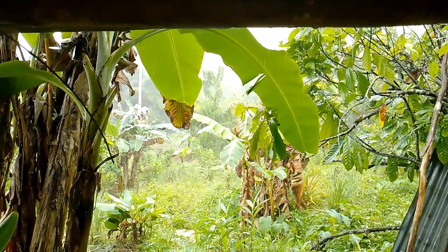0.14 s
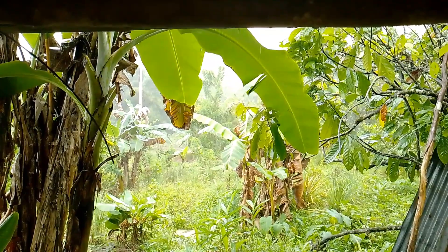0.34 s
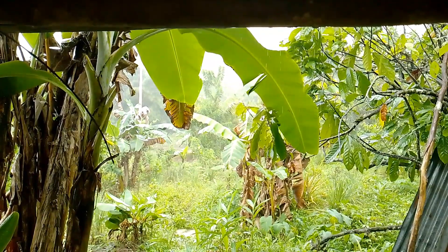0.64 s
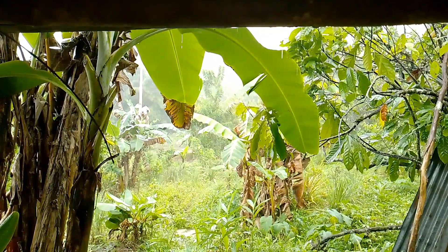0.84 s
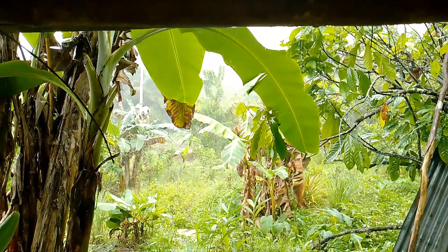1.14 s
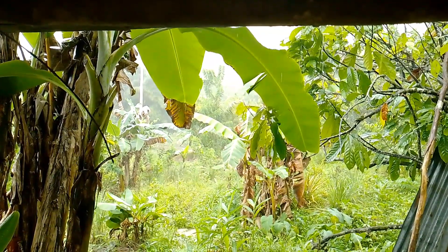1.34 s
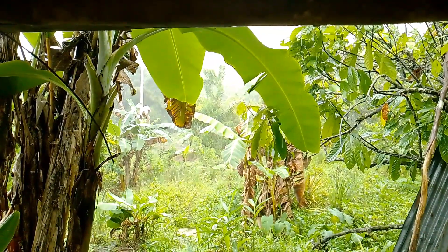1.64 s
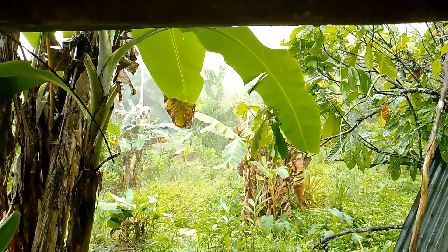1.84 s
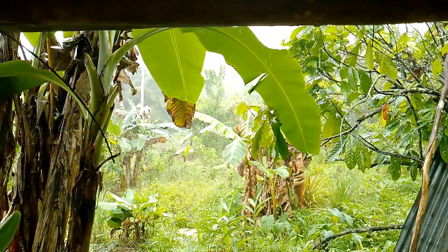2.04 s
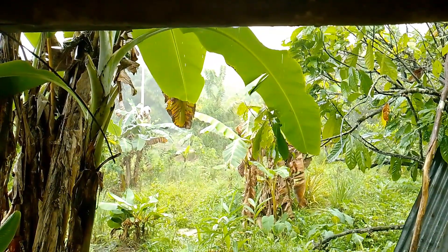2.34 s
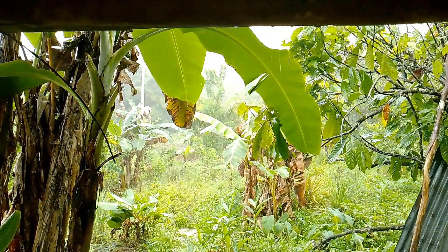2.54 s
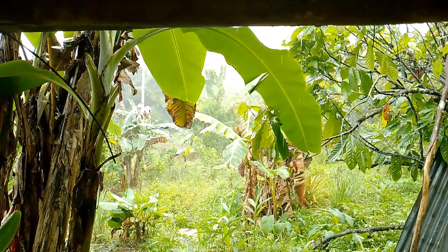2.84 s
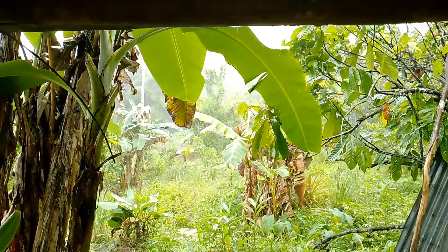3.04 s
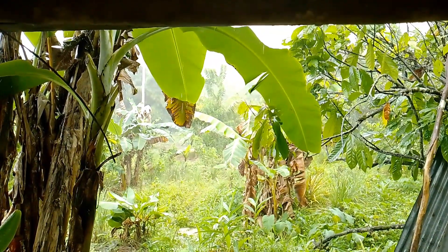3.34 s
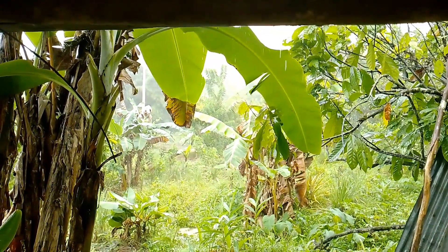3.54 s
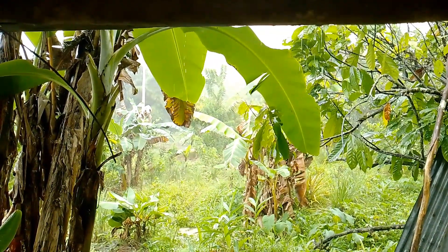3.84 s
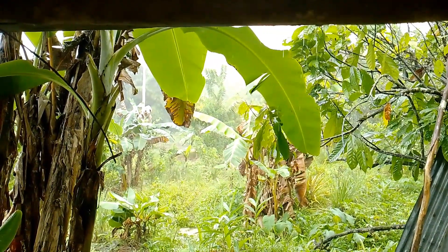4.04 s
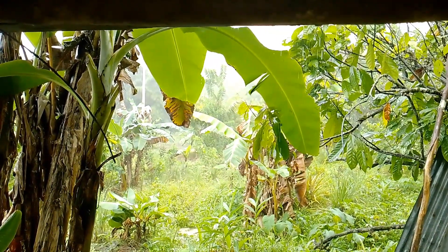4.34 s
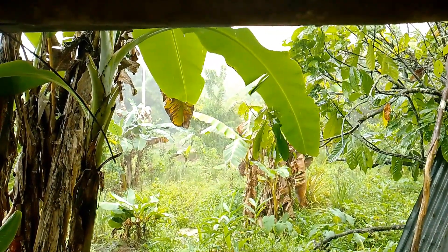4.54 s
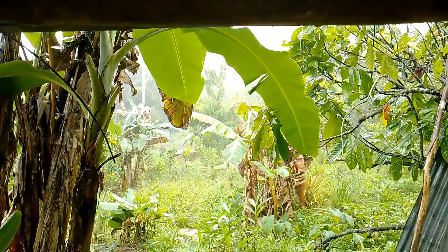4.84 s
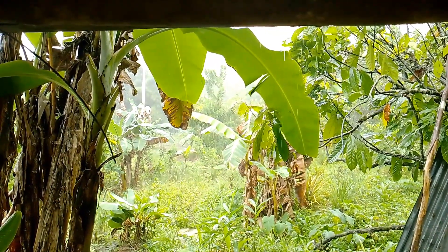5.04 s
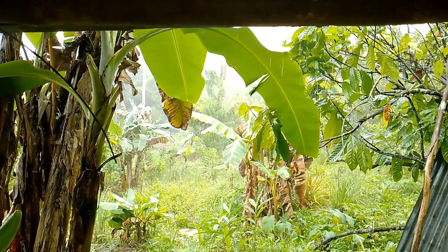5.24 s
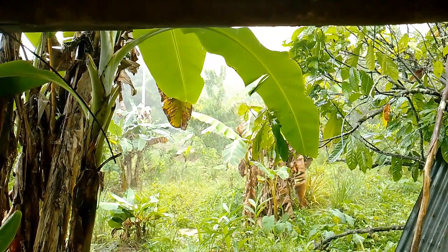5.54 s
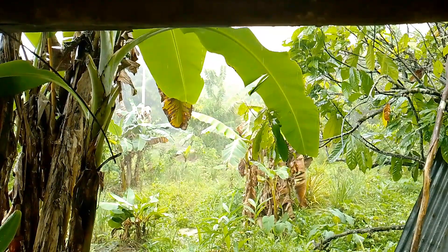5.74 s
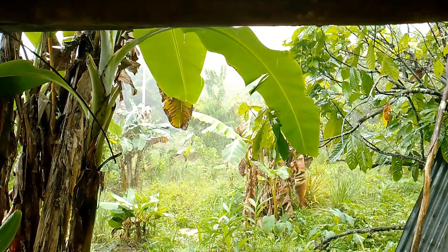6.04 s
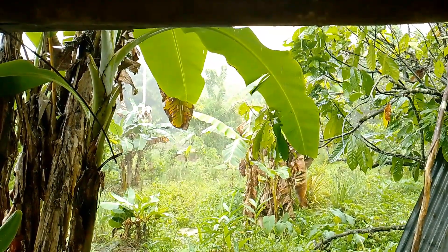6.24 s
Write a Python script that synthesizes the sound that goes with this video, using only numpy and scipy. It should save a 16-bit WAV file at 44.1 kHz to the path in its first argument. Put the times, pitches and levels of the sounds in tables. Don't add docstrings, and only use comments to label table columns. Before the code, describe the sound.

Dense continuous rainfall on foliage, gently swelling and easing, dotted with tiny bright leaf ticks and occasional hollow, drum-like drips.

```python
import sys
import numpy as np
from scipy import signal
from scipy.fft import rfft, irfft
from scipy.io import wavfile
from scipy.ndimage import uniform_filter1d

SR = 44100
rng = np.random.default_rng(int(sys.argv[2]) if len(sys.argv) > 2 else 0)


def waveform_to_disk(signal):
    frames = np.transpose(np.atleast_2d(signal))
    scaled = np.clip(frames, -1, 1) * 32767
    samples = np.round(scaled).astype(np.int16)
    wavfile.write(sys.argv[1], SR, samples)


def elevation(decibels):
    levels = np.asarray(decibels, float)
    return 10 ** (levels / 20)


N = 282284

# (time [s], roar level [dB])
SHOWER = [(0, -29), (0.7, -29), (1.2, -27.6), (1.5, -28), (2.1, -26.8), (2.5, -27.5), (2.9, -27.2),
          (3.6, -27.4), (4.1, -27.9), (4.4, -27.5), (5.0, -28.2), (5.4, -27.5), (5.9, -28.4), (6.4, -26.5)]
# (frequency [Hz], level per Hz [dB])
ROAR_TONE = [(97, -53), (165, -35), (210, -14), (318, -6), (517, -8), (698, -1.5), (982, -5), (1230, 1),
             (1400, -3.5), (2220, -0.5), (3400, -9), (3920, -9), (5000, -20.5), (6500, -44), (11000, -120)]
# (frequency [Hz], level per Hz [dB])
LEAF_TONE = [(2940, -32), (5000, -2.5), (5570, 0.0), (7430, -12), (9480, -9.5), (12700, -24.5),
             (15200, -19)][:-1] + [(15500, -18)]
# (frequency [Hz], level per Hz [dB])
RUMBLE_TONE = [(13, -41), (22, -8), (27, -14), (43, -12.5), (113, 5.5), (131, 1.5), (160, -4), (210, -36),
               (350, -120)]
# (time [s], peak level [dB], ring [Hz])
DROPS = [(0.3785, -31, 8100), (0.5516, -41, 8800), (1.0036, -45.5, 9420), (1.2974, -31, 7770),
         (1.3568, -39, 8680), (1.3843, -38.5, 9270), (1.5818, -35, 8290), (1.6247, -31, 8590),
         (1.9594, -41, 9840), (2.0043, -35, 8430), (2.8015, -32, 8510), (3.3603, -45, 8380),
         (3.3912, -36, 8950), (3.496, -41, 8700), (3.5773, -33, 9730), (3.6247, -44, 9340),
         (3.7863, -37, 9180), (4.1215, -33, 8050), (4.6708, -40.5, 8390), (4.8209, -40, 8190),
         (5.1682, -41, 9590), (5.2165, -42, 7710), (5.4859, -42, 8580), (5.6665, -34, 9430),
         (5.7044, -33, 8620), (5.7458, -39, 9350), (5.8127, -37, 9220), (6.132, -34, 8970),
         (6.1599, -42, 8430), (6.2472, -39, 8770)]
# (time [s], peak level [dB])
SMACKS = [
    (0.3785, -34),
    (2.801, -39),
    (3.3618, -39),
    (5.666, -39),
    (5.7049, -37),
    (5.8127, -40),
    (6.133, -37),
    (6.3734, -39),
]
# (time [s], peak level [dB])
SPRAYS = [
    (0.4892, -52),
    (1.1846, -45),
    (1.3837, -51),
    (2.0651, -45),
    (3.3612, -43),
    (3.5762, -50),
    (4.1993, -47),
    (5.1676, -54),
    (5.7038, -51),
    (6.2461, -52),
]
# (time [s], peak level [dB], ring [Hz])
DRUMS = [
    (2.482, -25, 716),
    (2.559, -25, 704),
    (4.321, -25.5, 670),
    (4.419, -32, 746),
    (4.554, -24.5, 750),
    (4.855, -28, 678),
]

LOW_FOLLOWS, HISS_FOLLOWS = 0.32, 0.39
ROAR_TRIM_DB, HISS_DB, RUMBLE_DB = 2.0, -46.4, -64
LOW_CUT_HZ, LOW_CUT_WIDTH_HZ, TOP_HZ = 165, 11, 15500


def level(x, db):
    return x * elevation(db) / np.sqrt(np.mean(x ** 2))


def colour(x, table):
    size = 2 ** 13
    hz, db = np.transpose(table)
    log_hz = np.log(np.fft.rfftfreq(size, 1 / SR) + 1)
    log_gain = np.interp(log_hz, np.log(hz), db) * np.log(10) / 20
    cepstrum = irfft(log_gain)
    cepstrum[1:size // 2] *= 2
    cepstrum[size // 2 + 1:] = 0
    response = irfft(np.exp(rfft(cepstrum)))
    return signal.fftconvolve(x, response)[:N]


def band(x, hz, width):
    b, a = signal.iirpeak(min(hz, 0.45 * SR), hz / width, fs=SR)
    return signal.lfilter(b, a, x)


def walk(rate):
    hold = int(SR / rate)
    steps = np.repeat(rng.standard_normal(N // hold + 1), hold)
    smooth = uniform_filter1d(uniform_filter1d(steps, hold), hold)
    return 1.5 * smooth[:N]


def impacts(rate, spread_db, t60):
    lands = rng.random(N) < rate / SR
    size = elevation(spread_db * np.minimum(rng.exponential(size=N), 4))
    fade = np.exp(-2 * np.log(1000) / (t60 * SR))
    energy = signal.lfilter([1], [1, -fade], lands * size ** 2)
    return level(np.sqrt(energy) * rng.standard_normal(N), 0)


def patches(centres, rate, spread_db, cycles, swell_db, low_db=0):
    octave = np.log2(np.fft.rfftfreq(N, 1 / SR) + 1)
    out = 0
    for centre in centres:
        share = np.cos(np.pi / 2 * np.clip(octave - centre, -1, 1))
        splashes = impacts(rate, spread_db, cycles / 2 ** centre)
        patch = irfft(rfft(splashes) * share, N)
        gain_db = swell_db * walk(4) + low_db * (centre < 10)
        out = out + patch * elevation(gain_db)
    return out


def roar(low_db):
    far_drops = patches(range(6, 15), 7000, 0.62, 70, 0.3, low_db)
    return level(colour(far_drops, ROAR_TONE), 0)


def leaves():
    spray = patches(range(11, 15), 8000, 1.5, 150, 0.5)
    patter = patches(np.arange(12.5, 15), 120, 2.5, 120, 1.5)
    bright = signal.lfilter([1, -0.3], [1], patter)
    return level(colour(spray + elevation(-9) * bright, LEAF_TONE), 0)


def rumble():
    return level(colour(rng.standard_normal(N), RUMBLE_TONE), RUMBLE_DB)


def ringing_drops(table, width, t60, trim_db):
    out = np.zeros(N + SR)
    t = np.arange(SR // 3) / SR
    noise = rng.standard_normal((len(table), len(t)))
    rise = 1 - np.exp(-t / (0.029 * t60))
    shape = rise * np.exp(-np.log(1000) * t / t60)
    for (s, db, hz), splash in zip(table, noise):
        start = int(s * SR)
        ring = band(band(splash, hz, width), hz, width)
        out[start:start + len(t)] += shape * level(ring, db + trim_db)
    return out[:N]


def leaf_ticks():
    return ringing_drops(DROPS, width=3200, t60=0.015, trim_db=-6.0)


def smacks():
    hits = [(s, db, 5500) for s, db in SMACKS]
    return ringing_drops(hits, width=4500, t60=0.016, trim_db=-1.5)


def fine_sprays():
    bursts = [(s, db, 15000) for s, db in SPRAYS]
    return ringing_drops(bursts, width=2500, t60=0.025, trim_db=-5)


def leaf_drums():
    return ringing_drops(DRUMS, width=110, t60=0.4, trim_db=-6.5)


def scene():
    roar_db = np.interp(np.arange(N) / SR, *np.transpose(SHOWER))
    swell_db = roar_db - roar_db.mean()
    far = elevation(roar_db + ROAR_TRIM_DB) * roar((LOW_FOLLOWS - 1) * swell_db)
    hiss = elevation(HISS_DB + HISS_FOLLOWS * swell_db) * leaves()
    near = leaf_ticks() + smacks() + fine_sprays() + leaf_drums()
    return (far + hiss + rumble() + near)[None]


def roll_off(x):
    return signal.sosfilt(signal.butter(12, 15500, fs=SR, output="sos"), x)


def record(dry):
    b, a = signal.iirnotch(LOW_CUT_HZ, LOW_CUT_HZ / LOW_CUT_WIDTH_HZ, fs=SR)
    notched = signal.lfilter(b, a, dry)
    below_top = np.fft.rfftfreq(N, 1 / SR) < TOP_HZ
    mix = irfft(rfft(notched) * below_top, N)
    return roll_off(mix)


dry = scene()
out = record(dry)
waveform_to_disk(out)
```